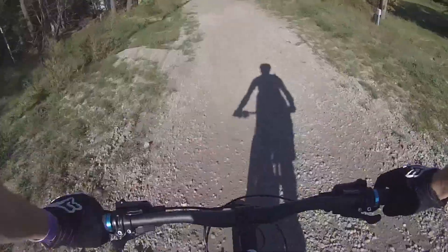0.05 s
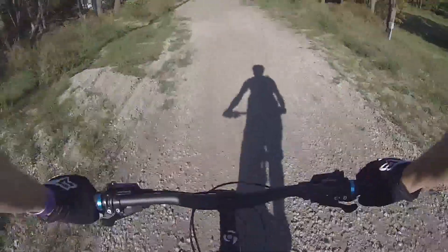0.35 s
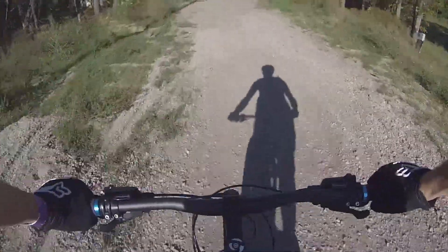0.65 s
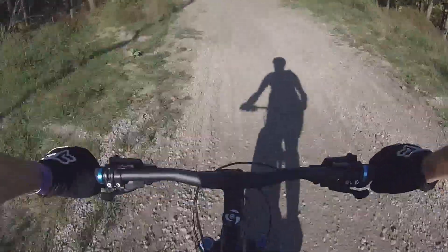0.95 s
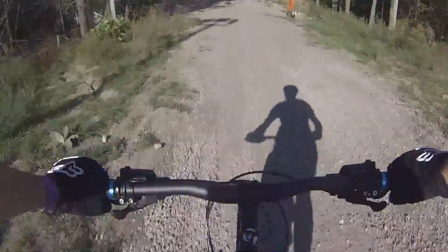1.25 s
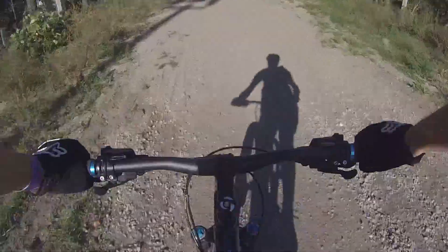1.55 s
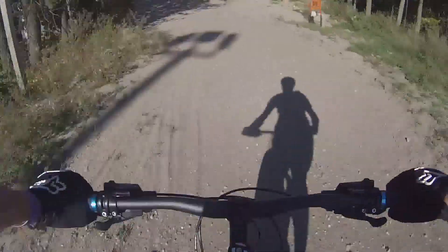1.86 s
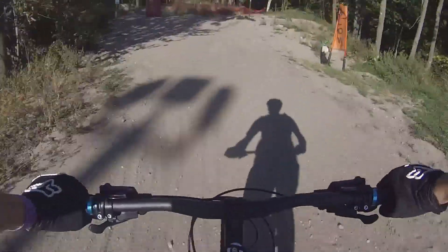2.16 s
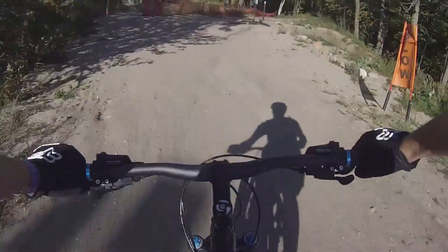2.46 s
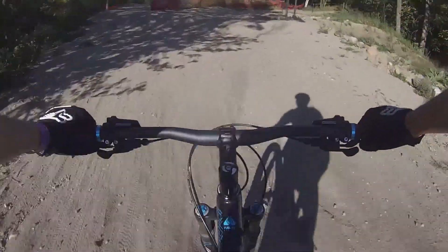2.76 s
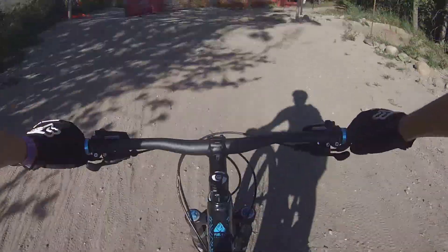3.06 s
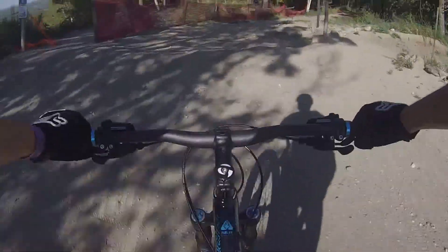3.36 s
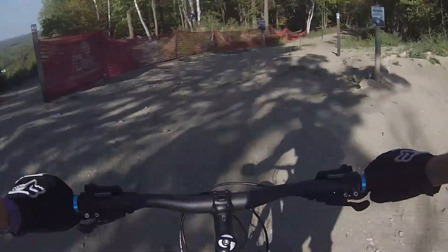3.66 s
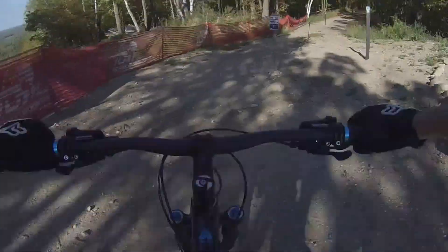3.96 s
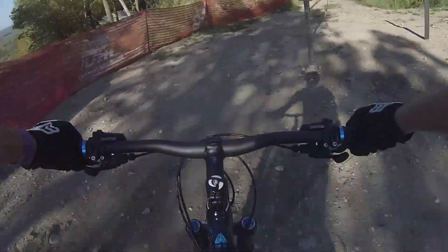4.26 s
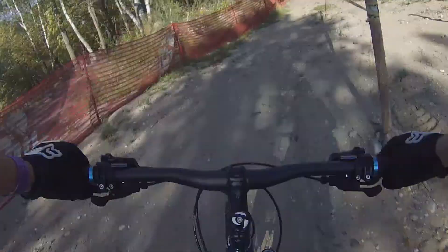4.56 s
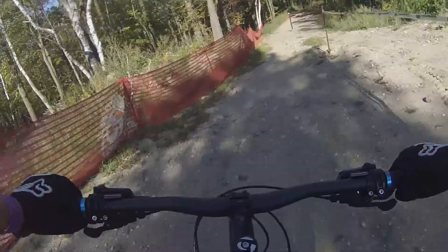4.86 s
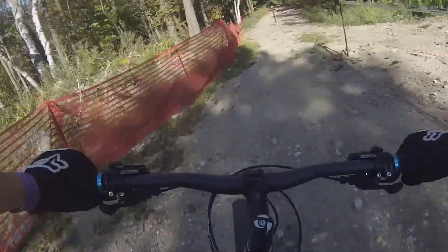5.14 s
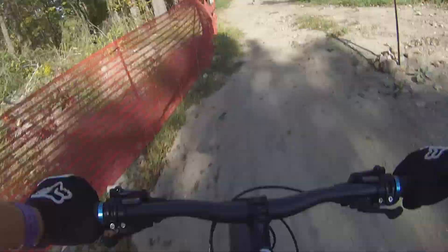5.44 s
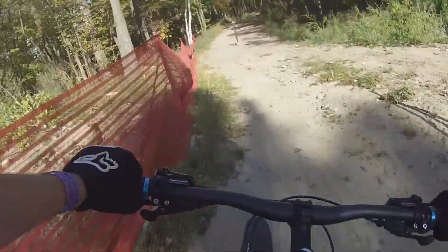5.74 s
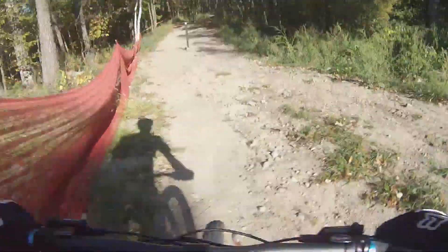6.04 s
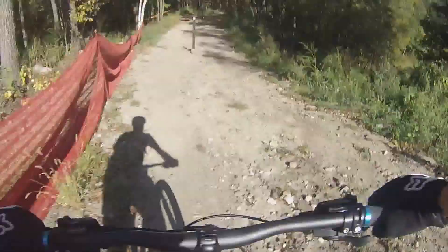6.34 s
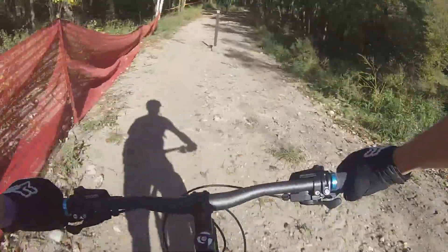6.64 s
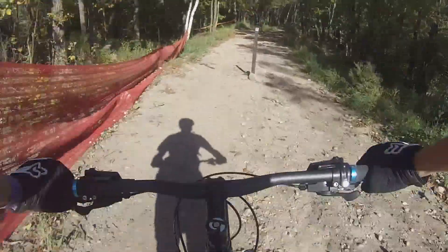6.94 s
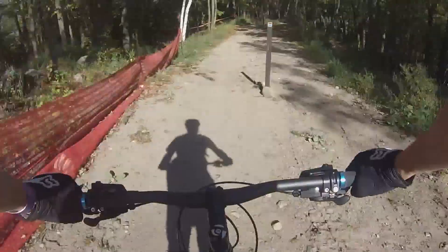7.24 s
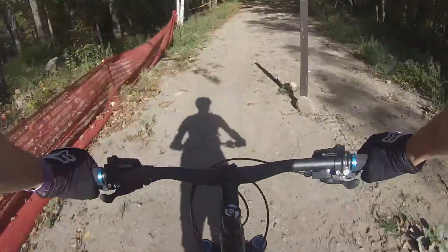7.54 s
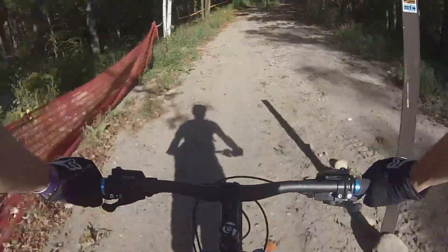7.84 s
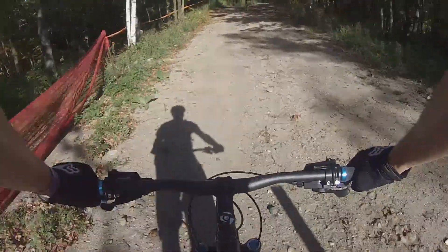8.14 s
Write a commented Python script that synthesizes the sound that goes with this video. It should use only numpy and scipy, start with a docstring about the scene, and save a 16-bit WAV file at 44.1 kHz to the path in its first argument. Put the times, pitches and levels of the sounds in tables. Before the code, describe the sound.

Low, gusty wind hits a chest-worn microphone over the roar of knobby bike tyres on an outdoor gravel trail, with ticking pebbles, thuds and chain slaps. The wind drops and a tread hum comes through. The rolling briefly fades as the bike floats, then returns with a clank and rattling. Wind rises again toward the end, with one sharp stone strike and a hard, low thump.

```python
"""A gravel and dirt trail, heard from a camera on a mountain biker's chest, about a metre above the tyres.
From the start gusts buffet the microphone, the tyres roar, hum and crunch, stones knock and the chain
clatters, mostly coloured by the camera's case. The bike hops at 1.5 s and the wind eases. Near 4 s it
floats over a crest, then lands with a clank of chain and rattles on. The gusts build again, a big stone
hits the frame at 6.9 s, and a hard, dull thump comes just after 8 s."""
import sys
import numpy as np
from scipy import signal
from scipy.fft import rfft, irfft
from scipy.io import wavfile
from scipy.ndimage import uniform_filter1d

SR = 44100
rng = np.random.default_rng(int(sys.argv[2]) if len(sys.argv) > 2 else 0)


def unload_wav(signal):
    """Save mono or channel-first audio to the path in sys.argv[1] as 16-bit WAV at rate SR, clipped to [-1, 1]."""
    wavfile.write(
        sys.argv[1],
        SR,
        np.round(np.clip(np.atleast_2d(signal).T, -1, 1) * 32767).astype(np.int16),
    )


N = 370440
TIME = np.arange(N) / SR
TAPS = 2 ** 12  # length of a ring [samples]

# the ground under the tyres: (time [s], roar [dB], coarse gravel [dB], fine grit [dB])
TRAIL = [(0, -30.5, -1, -0.5), (0.6, -27.5, 0.5, -1), (1.15, -28, -4.5, -4.5), (1.28, -24.5, 7, 4),
         (1.38, -21.5, 8, 5), (1.5, -24, 1, 1.5), (1.68, -28, 2, 2.5), (2.05, -27, 2, 1.5),
         (2.6, -28.5, 2.5, 0), (3.15, -27.5, -2, 3.5), (3.4, -31, -0.5, 0), (3.8, -32, 3, 0.5),
         (4.6, -31, -1, 0.5), (5.2, -28, 6.5, 1.5), (5.55, -28.5, 0, 3), (5.88, -31.5, 3, 5.5),
         (6.1, -39, 4, 1.5), (6.22, -34.5, 3, 1), (6.85, -30.5, 3, -0.5), (7.8, -28, -3.5, -2),
         (8.4, -29, -6.5, -7)]
# bumps under the wheels: (time [s], relative level [dB], pitch [Hz])
BUMPS = [(0.123, -17.5, 662), (0.471, -18.5, 810), (0.972, -16.5, 550), (1.0, -19, 920), (1.014, -15, 600),
         (1.447, -16.5, 800), (1.636, -25, 1080), (2.033, -16, 750), (2.052, -17.5, 835), (2.241, -19, 950),
         (2.748, -26, 829), (3.007, -16, 1080), (3.35, -18, 947), (3.78, -19.5, 867), (4.351, -18.5, 838),
         (4.465, -13.5, 660), (4.586, -15, 1069), (4.669, -25, 942), (4.875, -27, 960), (5.011, -22, 940),
         (5.161, -10.5, 755), (5.267, -18, 1030), (5.414, -19.5, 1020), (5.52, -18.5, 800),
         (5.635, -15, 881), (6.353, -24, 930), (7.287, -20.5, 930), (7.446, -20.5, 941),
         (7.729, -15.5, 950), (8.029, -22, 581), (8.131, -20, 668), (8.1745, -18.5, 699),
         (8.339, -17.5, 807)]


def undb(db):
    """Decibels to gain."""
    return 10 ** (np.asarray(db) / 20)


def curves(table):
    """The columns of a table, joined by straight lines in time."""
    times, *columns = np.transpose(table)
    return [np.interp(TIME, times, column) for column in columns]


def steady(x, span_s):
    """Hold the running rms at 1, leaving the faster grain."""
    return x / np.sqrt(np.abs(uniform_filter1d(x * x, int(span_s * SR) + 1)) + 1e-12)


def walk(rate_hz):
    """Smooth random wandering with a spread of 1."""
    hold = int(SR / rate_hz)
    steps = np.repeat(rng.standard_normal(N // hold + 1), hold)[:N]
    smooth = uniform_filter1d(uniform_filter1d(steps, hold), hold)
    return smooth / smooth.std()


def add(out, s, sound):
    """Mix a sound in at a time."""
    start = max(int(s * SR), 0)
    out[start:start + len(sound)] += sound[:len(out[start:])]


def through_case(force, spectrum):
    """Ring a force through a spectrum and the resonances of the case around the microphone."""
    # resonances of the camera case: (frequency [Hz], width [Hz], boost [dB])
    case_modes = [(678.5, 63, 6), (950, 41, 4), (1695, 390, 7), (2816, 570, 9), (5110, 94, 3),
                  (5385, 370, 7.5), (5710, 280, 4), (5990, 220, 3.5), (6990, 100, 6), (8370, 100, 4.5),
                  (9400, 170, 3)]
    freqs = np.maximum(np.fft.rfftfreq(TAPS, 1 / SR), 1)
    hz, db = np.transpose(spectrum)
    db = np.interp(np.log(freqs), np.log(hz), db)
    db += sum(boost / (1 + (2 * (freqs - centre) / width) ** 2) for centre, width, boost in case_modes)
    # minimum phase: the ring follows the blow
    cepstrum = irfft(np.log(undb(db)))
    cepstrum[1:TAPS // 2] *= 2
    cepstrum[TAPS // 2 + 1:] = 0
    impulse = irfft(np.exp(rfft(cepstrum)))
    return signal.oaconvolve(force, impulse / np.linalg.norm(impulse))[:len(force)]


def resonate(x, hz, width_hz):
    """One resonance, gain 1 at its centre."""
    return signal.lfilter(*signal.iirpeak(min(hz, .45 * SR), hz / width_hz, fs=SR), x)


def ringing(modes):
    """Modes struck at once, each dying at its own rate."""
    t = TIME[:2 * TAPS]
    return sum(undb(db - 60 * t / t60) * np.sin(2 * np.pi * hz * t) for hz, db, t60 in modes)


def grains(per_s, spread_db):
    """Tiny contacts at random moments, most weak and a few strong."""
    hit = rng.random(N) < per_s / SR
    return hit * rng.choice([-1, 1], N) * undb(spread_db * np.clip(rng.standard_normal(N), -3, 2.6))


def blow(spectrum, rise_s, fall_s, snap):
    """A first contact of strength snap and a short scrape, rung through a spectrum and the case."""
    t = TIME[:2 * TAPS]
    force = rng.standard_normal(len(t)) * (1 - np.exp(-t / rise_s)) * np.exp(-t / fall_s)
    force /= np.linalg.norm(force)
    force[0] += snap
    return through_case(force, spectrum)


def airstream(full_buffet_db):
    """Levels [dB] of buffet and eddies: a fluttering airstream with bell-shaped gusts on top."""
    # the airstream between gusts: (time [s], buffet level [dB])
    breeze = [(0, -22), (0.72, -24.5), (0.85, -29.5), (1.07, -32), (1.25, -24), (1.5, -17), (1.75, -31.5),
              (2.8, -38), (3.6, -30), (4.05, -43.5), (4.7, -32.5), (5.05, -20), (5.42, -37.5),
              (6.09, -38.5), (6.13, -25.5), (7.45, -24.5), (7.8, -23.5), (8.4, -18.5)]
    # gusts on the microphone: (time of peak [s], level [dB], length [s], extra turbulence [dB])
    gusts = [(0.057, -15, 0.1, -2), (0.136, -14.5, 0.03, 4.5), (0.203, -11.5, 0.057, -1),
             (0.27, -13.5, 0.045, -4.5), (0.464, -13, .11, 3.5), (0.593, -10, 0.041, 0.5),
             (0.705, -11, 0.12, -5.5), (0.928, -15, 0.061, 0.5), (0.975, -14.5, 0.02, 4),
             (1.007, -13, 0.045, 8), (1.188, -17.5, 0.15, 5.5), (1.28, -13.5, 0.1, 0.5),
             (1.388, -17.5, 0.03, 6.5), (1.49, -10.5, 0.016, -3), (1.948, -23, 0.1, 1.5),
             (2.295, -25, .04, -4), (2.377, -29.5, 0.081, 5.5), (3.433, -29, 0.065, 4),
             (3.88, -27.5, 0.052, 3.5), (4.196, -34, 0.042, -4), (4.401, -25.5, 0.052, -15),
             (4.488, -22, .04, -7), (4.833, -15.5, 0.069, -5.5), (4.95, -23, 0.11, -2),
             (5.058, -17, 0.04, 8), (5.214, -17, 0.065, -4), (6.142, -22, 0.045, -5),
             (6.258, -26.5, 0.035, 7), (6.483, -17.5, 0.035, -9), (6.711, -23.5, 0.086, 6),
             (6.886, -19.5, 0.03, -2), (7.062, -19.5, 0.077, 0), (7.177, -23.5, 0.099, 3),
             (7.293, -18, 0.028, -2), (7.537, -15, 0.024, -5), (7.651, -14.5, 0.07, -0.5),
             (7.772, -9.5, 0.039, 3), (7.84, -11.5, 0.065, 4), (7.974, -18, 0.027, 7),
             (8.046, -10, 0.062, -1), (8.275, -16.5, 0.034, 6), (8.35, -12.5, 0.025, 1)]
    breeze_db, = curves(breeze)
    power = undb(breeze_db + 1.3 * walk(16)) ** 2
    turbulence = power.copy()
    for s, db, length, extra_db in gusts:
        near = np.abs(TIME - s) < 2 * length
        bell = np.exp(-(2 * (TIME[near] - s) / length) ** 2)
        power[near] += bell * undb(db) ** 2
        turbulence[near] += bell * undb(db + extra_db) ** 2
    excess_db = 10 * np.log10(turbulence) - full_buffet_db
    eddy_db = full_buffet_db - 7 + 0.93 * excess_db
    return 10 * np.log10(power), eddy_db


def wind(full_buffet_db=-15.5):
    """Large eddies shove the microphone; small ones tear off in flurries as each shove peaks."""
    # rumble of the large eddies: (frequency [Hz], level [dB])
    buffet_spectrum = [(12, -19), (25, -3), (50, -1), (85, -1.5), (125, -5), (180, -16.5), (300, -23.5),
                       (700, -86.5)]
    # flutter of the small eddies: (frequency [Hz], level [dB])
    eddy_spectrum = [(50, -24.5), (110, -8), (160, 0.5), (250, -5), (400, -10), (600, -18.5), (1000, -40),
                     (2000, -43.5), (5000, -79)]
    buffet_db, eddy_db = airstream(full_buffet_db)
    shove = through_case(rng.standard_normal(N), buffet_spectrum)
    # slower air sheds slower eddies, so a weak buffet is also a deeper one
    slow = signal.sosfilt(signal.butter(1, 45, fs=SR, output="sos"), shove)
    speed = np.clip(undb(0.75 * (buffet_db - full_buffet_db)), 0, 1)
    buffet = steady(slow + speed * (shove - slow), span_s=0.0627)
    flurry = undb(5.4 * walk(70)) * (1 + 0.28 * np.abs(buffet))
    eddies = steady(through_case(rng.standard_normal(N) * flurry, eddy_spectrum), span_s=0.034)
    return buffet * undb(buffet_db) + eddies * undb(eddy_db + 1.34 * walk(25))


def air_hiss(level_db=-51.5):
    """A faint, even hiss of rushing air that stays when the wheels leave the ground."""
    # air passing the microphone: (frequency [Hz], level [dB])
    hiss_spectrum = [(500, 0), (1500, -3.5), (3000, -4), (5500, -3.5), (8000, -13.5), (13000, -20),
                     (15500, -52)]
    return through_case(rng.standard_normal(N), hiss_spectrum) * undb(level_db)


def contact_db():
    """Weight on the tyres: it fades at take-off, slams back on landing and settles; bumps add jolts."""
    # the wheels leave the ground: (take-off [s], landing [s], drop in the air [dB], landing surge [dB])
    jumps = [(1.523, 1.637, -14, -0.5), (3.91, 4.348, -15.5, 11)]
    lift_s, touch_s, settle_s = 0.085, 0.013, 0.19  # tyres unload; tyres flatten; suspension recovers
    hard_bump_db, jolt_s = -11.5, 0.024  # a bump this hard adds 1 dB of weight
    weight_db = np.zeros(N)
    for off, down, drop_db, surge_db in jumps:
        flying = drop_db * (1 - np.exp(-np.maximum(TIME - off, 0) / lift_s))
        landed = surge_db * np.exp(-np.maximum(TIME - down, 0) / settle_s)
        touch = np.clip(.5 + (TIME - down) / (2 * touch_s), 0, 1)
        weight_db += (1 - touch) * flying + touch * landed
    recovery = np.exp(-TIME[:2 * TAPS] / jolt_s)
    for s, bump_db, _ in BUMPS:
        add(weight_db, s, undb(.5 * (bump_db - hard_bump_db)) * recovery)
    return weight_db


def stirred_db(load_share, mean_roar_db=-28):
    """Loose stuff is stirred more under a hard-working tyre, and hardly at all in the air."""
    roar_db, _, _ = curves(TRAIL)
    weight_db = contact_db()
    airborne_hush_db = 0.61 * np.minimum(weight_db, 0)
    return load_share * (roar_db - mean_roar_db) + weight_db + airborne_hush_db


def tyres():
    """Knobs pound the dirt, crush gravel and spray grit, all surging with the load on the wheels."""
    # knobs on dirt: (frequency [Hz], level [dB])
    roar_spectrum = [(60, -5.5), (220, -5.5), (330, 4), (420, 2.5), (500, 2.5), (580, -3.5), (800, 1),
                     (1100, -1.5), (1400, -16), (2200, -26.5), (5000, -69.5)]
    # crushed gravel: (frequency [Hz], level [dB])
    crunch_spectrum = [(600, -10.5), (1200, 10), (1600, -2), (2200, -8), (3000, -0.5), (3700, -5.5),
                       (5000, -10.5), (9000, -39)]
    # sprayed grit: (frequency [Hz], level [dB])
    grit_spectrum = [(2000, -5), (3700, -7), (4500, 2.5), (6300, -1), (7400, -11.5), (9300, -13.5),
                     (11000, -18), (13000, -33), (15500, -46)]
    roar_db, coarse_db, fine_db = curves(TRAIL)
    load, bounce = walk(55), walk(16)
    pounding = grains(per_s=3500, spread_db=3.5) * undb(2.2 * load)
    crushing = grains(per_s=2000, spread_db=3.0) * undb(1.56 * load + 2.4 * walk(90))
    spraying = grains(per_s=6000, spread_db=2.5) * undb(0.78 * load + 2.4 * walk(110))
    roar = steady(through_case(pounding, roar_spectrum), span_s=0.11)
    crunch = steady(through_case(crushing, crunch_spectrum), span_s=0.29)
    grit = steady(through_case(spraying, grit_spectrum), span_s=0.21)
    return (roar * undb(-1.35 + roar_db + contact_db() + bounce)
            + crunch * undb(-43 + coarse_db + stirred_db(load_share=0.69) + 1.24 * bounce)
            + grit * undb(-47 + fine_db + stirred_db(load_share=0.58) + 0.9 * bounce))


def tread(mismatch=0.035, waver=0.034, rear_db=-3, rough_db=4):
    """Rows of knobs beat a hum that wavers with the ground; the two tyres throb against each other."""
    # hum of the tread: (time [s], pitch [Hz], level [dB])
    hum_course = [(0, 289.7, -38), (1.5, 292.3, -39), (1.85, 297, -30), (2.08, 299.4, -28),
                  (2.32, 308, -29.5), (2.62, 316, -31.5), (2.95, 306, -35.5), (3.25, 301.7, -35),
                  (3.8, 301, -35.5), (4.03, 298, -29.5), (4.25, 298, -42.5), (4.47, 296, -35),
                  (4.9, 297.3, -36), (5.5, 310.2, -31), (6.0, 295.2, -42.5), (8.4, 301.7, -37.5)]
    hz, db = curves(hum_course)
    front_hz = hz * (1 + mismatch / 2 + waver * walk(70))
    rear_hz = hz * (1 - mismatch / 2 + waver * walk(70))
    front, rear = (np.sin(2 * np.pi * np.cumsum(pitch) / SR) for pitch in (front_hz, rear_hz))
    hum = (front + undb(rear_db) * rear) * undb(rough_db * walk(50))
    return steady(hum, span_s=0.16) * undb(db + 0.94 * contact_db())


def pebbles(count=1300, skid_s=0.0012):
    """Pebbles clack against each other in little sprays; the smaller the pebble, the higher its tick."""
    # colour of the spray: (frequency [Hz], level [dB])
    pebble_spectrum = [(1000, -6), (1800, 9), (3000, -1), (4000, -7), (5800, 5.5), (7500, -5.5),
                       (10000, -12.5), (12500, -3), (15000, -23)]
    ticks, t = np.zeros(N), TIME[:TAPS // 4]
    for when, smallness, strength in rng.random((count, 3)):
        skid = rng.standard_normal(len(t)) * np.exp(-t / skid_s)
        hz = 1800 + 8500 * smallness ** 1.4
        tick = resonate(skid, hz, width_hz=hz / 4)
        add(ticks, when * N / SR, tick * undb(12 * strength ** 3 * (1 - .5 * smallness)))
    _, _, fine_db = curves(TRAIL)
    spray_db = -51.5 + 1.2 * walk(22) + 1.26 * fine_db + stirred_db(load_share=0.41)
    return steady(through_case(ticks, pebble_spectrum), span_s=0.47) * undb(spray_db)


def stones():
    """Flung stones give short, dry cracks centred on their own pitch; some ring a moment."""
    # knocks on rim and frame: (time [s], relative level [dB], pitch [Hz], ring [gain])
    knocks = [(0.0065, -21.5, 1900, 0.1), (0.0319, -18, 2850, 1.7), (0.124, -19.5, 1660, 1.5),
              (0.397, -28, 1600, 0.8), (0.4837, -23, 1800, 0.3), (0.717, -27, 2900, 1.2),
              (0.823, -22, 1700, 0.3), (0.919, -27, 1660, 2), (1.2555, -17, 1500, 0.3),
              (1.281, -14.5, 1630, 1.2), (1.3486, -19, 1700, 0.6), (1.381, -21, 2000, 0.3),
              (1.394, -17, 1700, 0.3), (1.438, -22, 2300, 0.2), (1.4484, -16.5, 1900, 0.1),
              (1.451, -22, 2900, 0.5), (1.5121, -26, 1700, 0.4), (2.04, -23, 1800, 0.1),
              (2.242, -22, 1600, 0.4), (3.1, -26, 1800, 0.4), (3.133, -27, 2000, 0.4),
              (3.781, -26, 1700, 0.1), (3.926, -28, 2800, 1.2), (4.385, -11.5, 1780, 1.3),
              (4.4523, -22, 1700, 1.2), (4.468, -20, 1700, 0.5), (4.531, -18, 1070, 1.2),
              (4.574, -24, 1700, 0.6), (4.744, -20, 1300, 0.5), (4.795, -25, 1500, 0.5),
              (4.875, -22, 1800, 0.1), (5.142, -16, 907, 1.5), (5.159, -19, 1800, 0.1),
              (5.162, -18.5, 2700, 0.3), (5.1635, -13, 855, 1.1), (5.267, -25, 1350, 0.6),
              (5.328, -20, 950, 1.2), (5.347, -25, 1500, 0.6), (5.364, -17, 1050, 1),
              (5.366, -27, 2950, 2.2), (5.417, -22, 1733, 2.2), (5.5, -24, 2900, 2),
              (5.544, -24, 3300, 0.6), (5.636, -25, 1400, 0.3), (5.785, -17.5, 1000, 1.2),
              (6.235, -24, 1900, 0.3), (6.592, -29, 1600, 0.6), (6.609, -21, 1640, 1.2),
              (6.778, -23, 1900, 0.4), (6.9288, -19, 2300, 0.2), (7.2678, -22.5, 1950, 1.1),
              (7.7297, -17.5, 1150, 0.4), (7.7307, -25, 2900, 0.2), (7.768, -18, 1960, 2.7),
              (7.945, -28, 1900, 0.3), (8.2318, -19.5, 1960, 2.0)]
    # crack of a stone: (frequency [multiple of its pitch], level [dB])
    crack_shape = [(0.1, -22), (0.55, -0.5), (1, 0), (1.35, -8), (1.8, -14), (3, -21), (7, -58)]
    out = np.zeros(N)
    for s, db, hz, ring in knocks:
        spectrum = [(hz * multiple, gain_db) for multiple, gain_db in crack_shape]
        knock = blow(spectrum, rise_s=0.00031, fall_s=0.0029, snap=0.97)
        knock += ring * resonate(knock, hz, width_hz=200)
        add(out, s, knock / np.linalg.norm(knock) * undb(db + 15))
    return out


def chain_rattle(jiggles_per_s=2.2, jiggle_db=-40, jiggle_s=0.005):
    """Links and cables slap the frame in bright bursts; harder slaps ring the chain more."""
    # hard slaps, with light random jiggles between them: (time [s], relative level [dB], length [s])
    slaps = [(0.026, -31, .003), (1.259, -25.5, 0.0038), (1.276, -28, 0.0046), (1.334, -35, .005),
             (1.372, -29.5, 0.023), (1.439, -26, 0.0049), (1.527, -21.5, 0.0051), (2.051, -32, .012),
             (2.086, -30, .009), (2.6, -30, 0.0067), (3.171, -25, 0.027), (3.691, -25.5, 0.0051),
             (3.784, -33.5, 0.022), (3.914, -37, 0.032), (4.386, -13, 0.014), (4.424, -21.5, 0.012),
             (4.448, -20.5, 0.0084), (4.464, -24.5, 0.018), (4.746, -23, 0.0028), (5.154, -29.5, .009),
             (5.483, -22.5, 0.02), (5.632, -29.5, 0.011), (5.831, -31, 0.042), (5.894, -32, .014),
             (6.768, -31.5, 0.0055), (6.887, -31.5, 0.012), (6.928, -27, 0.003), (7.029, -31.5, 0.005),
             (7.084, -30, 0.012), (7.222, -37, 0.019), (7.283, -33.5, 0.007), (7.507, -36, 0.027),
             (7.728, -23, 0.0043)]
    # colour of a slap: (frequency [Hz], level [dB])
    slap_spectrum = [(800, -18), (1700, 0), (3500, -11.5), (5000, 3.5), (6400, 3), (7500, -6.5),
                     (9200, -5.5), (12000, -18.5), (14000, -25), (15500, -48)]
    # ring of the chain and its guide: (frequency [Hz], width [Hz], gain [dB])
    chain_modes = [(4280, 150, 2), (5170, 39, -18), (5200, 42, -12), (5700, 26, -17), (6400, 200, -7),
                   (9930, 97, -10)]
    clatter, drive = np.zeros(N), np.zeros(N)
    shake_db = stirred_db(load_share=.5)
    jiggles = [(when * N / SR, jiggle_db + shake_db[int(when * N)] + 6 * (force - .5), jiggle_s)
               for when, force in rng.random((int(jiggles_per_s * N / SR), 2))]
    for s, db, length in slaps + jiggles:
        burst = blow(slap_spectrum, rise_s=0.18 * length, fall_s=0.64 * length, snap=0.27)
        burst *= np.sqrt(length * SR) * undb(db - 7)
        add(clatter, s, burst)
        add(drive, s, burst * undb(0.11 * (db - 4)))
    return clatter + sum(undb(db) * resonate(drive, hz, width) for hz, width, db in chain_modes)


def click(at_s=0.1212, peak_db=-11, decay_s=0.00035):
    """A single dry, very sharp click."""
    out = np.zeros(N)
    add(out, at_s, -undb(peak_db) * np.exp(-TIME[:TAPS] / decay_s))
    return out


def bumps():
    """Each bump thuds up through tyre and frame, favouring one pitch."""
    # colour of a thud: (frequency [Hz], level [dB])
    thud_spectrum = [(60, -2), (200, 2), (400, 0), (700, -4.5), (1050, -0.5), (1400, -15), (2500, -27.5),
                     (5000, -35), (12000, -99)]
    out = np.zeros(N)
    for s, db, hz in BUMPS:
        thud = blow(thud_spectrum, rise_s=0.00076, fall_s=0.004, snap=0.33)
        thud += 2.6 * resonate(thud, hz, width_hz=380)
        add(out, s, thud / np.linalg.norm(thud) * undb(db + 20.5))
    return out


def low_thumps(rise_cycles=0.3):
    """Sudden shoves of wind give a dull, low thump at the microphone, gone in a swing or two."""
    # low thumps: (time [s], envelope peak [dB], pitch [Hz])
    thumps = [(0.128, -7, 125), (0.986, -5, 90), (1.0158, -5.5, 135), (5.041, -9, 130), (7.059, -13, 85),
              (8.029, -8, 120), (8.176, -1.5, 191)]
    out, t = np.zeros(N), TIME[:TAPS]
    for s, db, hz in thumps:
        age = t * hz / rise_cycles
        add(out, s, undb(db) * age * np.exp(1 - age) * np.sin(2 * np.pi * hz * t))
    return out


def gravel_chips(skid_s=0.0013, snap=2.7, ring_q=2.2):
    """A pinched chip of gravel snaps free of the tyre: one sharp tick with a tiny skid."""
    # single chips: (time [s], relative peak [dB], pitch [Hz])
    chips = [(0.4835, -26, 5500), (0.515, -30, 8000), (0.651, -28, 5500), (0.836, -25.5, 5500),
             (0.928, -29, 5500), (1.006, -29, 5500), (1.109, -30, 5800), (1.2, -29, 5500),
             (1.2416, -35, 7000), (1.3314, -30, 9000), (1.3693, -21, 8500), (1.392, -27, 7000),
             (1.512, -31, 8500), (1.5265, -25, 6500), (1.537, -29, 6000), (1.548, -31, 10500),
             (1.5868, -34, 9500), (1.6662, -28, 11500), (1.6926, -32, 9500), (1.7759, -37, 9000),
             (2.748, -25, 5500), (3.691, -25, 7000), (4.532, -26, 5500), (4.867, -32, 5500),
             (5.2666, -28, 11000), (5.2836, -31, 8500), (5.301, -32, 9500), (5.3545, -34, 11500),
             (5.3794, -35, 11000), (5.397, -35, 10000), (5.4538, -35, 10000), (5.519, -19, 6000),
             (5.532, -25, 6500), (5.6039, -28, 7000), (5.6169, -30, 10000), (5.634, -28, 7000),
             (5.665, -33, 6000), (5.7211, -31, 7550), (5.8199, -27, 9500), (5.8957, -34, 8000),
             (6.082, -28, 4500), (6.3, -30, 5500), (6.441, -24.5, 4500), (6.779, -24, 5000),
             (6.998, -27, 5600), (7.054, -26, 5500), (7.405, -28, 6000), (7.522, -25, 6000),
             (7.7295, -22, 7000), (7.767, -29, 5400), (7.947, -30, 5500)]
    # colour of a tick: (frequency [Hz], level [dB])
    chip_spectrum = [(1500, -2), (5000, 4), (8000, -2), (11500, -5), (13000, -10), (15500, -29)]
    out, t = np.zeros(N), TIME[:TAPS // 4]
    for s, db, hz in chips:
        force = rng.standard_normal(len(t)) * np.exp(-t / skid_s)
        force[0] = snap
        tick = resonate(through_case(force, chip_spectrum), hz, width_hz=hz / ring_q)
        add(out, s, tick / np.abs(tick).max() * undb(db - 1.5))
    return out


def landing_clank(at_s=4.388, peak_db=-8, push_s=0.0056):
    """On the hard landing the chain whips the frame, which rings briefly."""
    # the struck metal: (frequency [Hz], level [dB], time to fall 60 dB [s])
    metal_modes = [(5080, 0, 0.032), (5450, 3, 0.031), (5500, 0, .03), (5960, -7, .03), (7800, -17, .018)]
    out, t = np.zeros(N), TIME[:2 * TAPS]
    links = rng.standard_normal(len(t)) * np.exp(-t / push_s)
    clank = signal.oaconvolve(links, ringing(metal_modes))[:len(t)]
    add(out, at_s, clank / np.abs(clank).max() * undb(peak_db))
    return out


def big_stone(at_s=6.9281, peak_db=-6.5, contact_s=0.0003):
    """A big stone presses on the hollow frame tube for an instant and leaves it ringing."""
    # the frame tube: (frequency [Hz], level [dB], time to fall 60 dB [s])
    tube_modes = [(955, -7, 0.035), (1240, -11, .016), (1670, 2, 0.011), (2250, -7, .005), (2780, -4, .013),
                  (4030, -19, .014), (5400, -13, .008)]
    out = np.zeros(N)
    push = np.hanning(int(contact_s * SR))
    clack = np.convolve(ringing(tube_modes), push)
    add(out, at_s, clack / np.abs(clack).max() * undb(peak_db))
    return out


def scene():
    """One microphone on the chest: wind right on it, rolling and knocks from the bike below."""
    rolling = tyres() + tread() + pebbles() + gravel_chips()
    knocks = bumps() + stones() + big_stone() + chain_rattle() + landing_clank()
    return (wind() + low_thumps() + air_hiss() + rolling + knocks + click())[None]


def record(dry, ceiling=0.92, top_hz=15400):
    """The camera rounds the strongest peaks and cuts the top."""
    rounded = dry / (1 + (dry / ceiling) ** 6) ** (1 / 6)
    return signal.sosfilt(signal.ellip(8, .2, 70, top_hz, fs=SR, output="sos"), rounded)


dry = scene()
out = record(dry)
unload_wav(out)
```